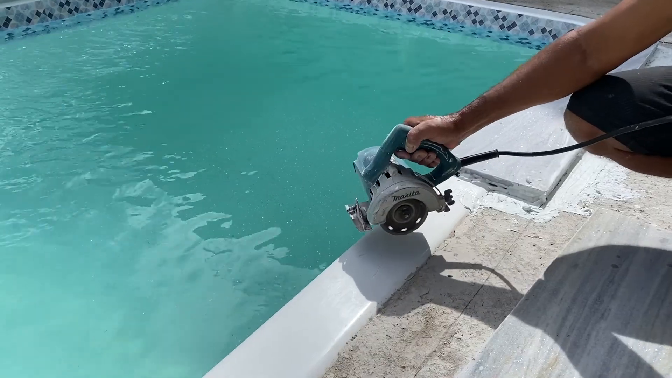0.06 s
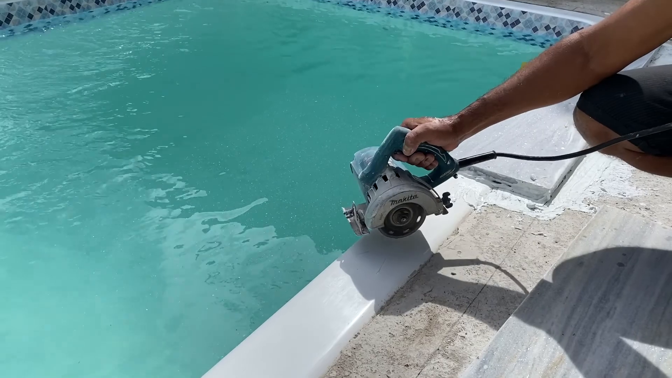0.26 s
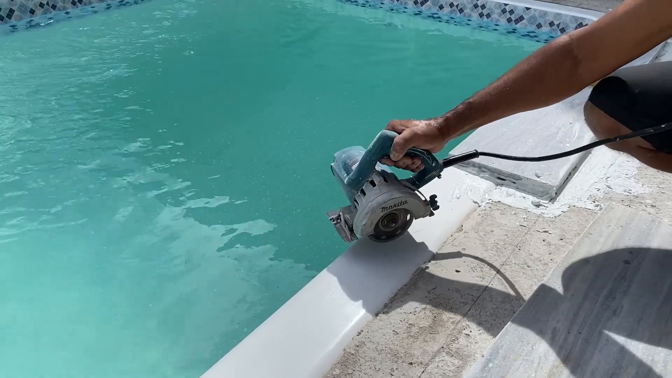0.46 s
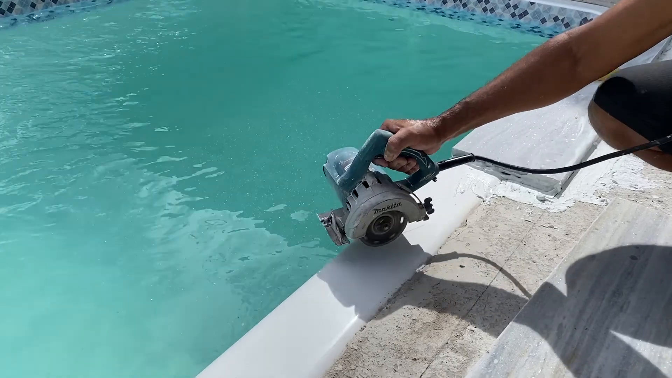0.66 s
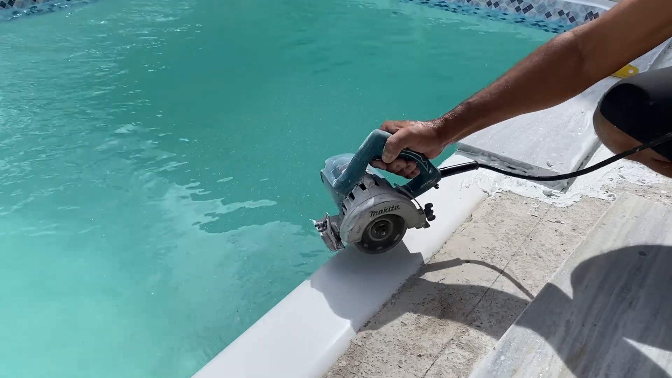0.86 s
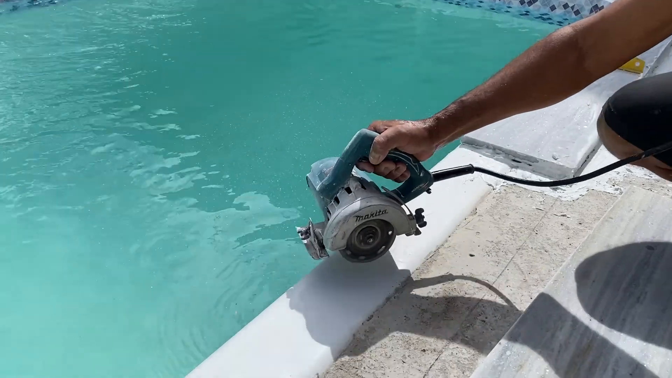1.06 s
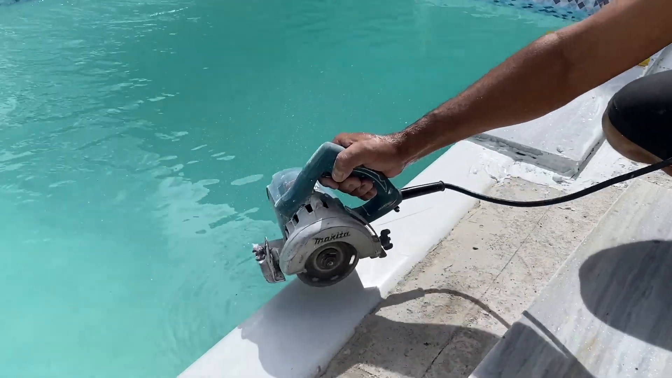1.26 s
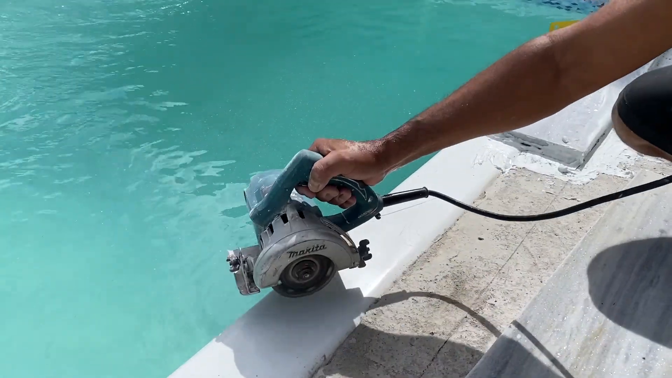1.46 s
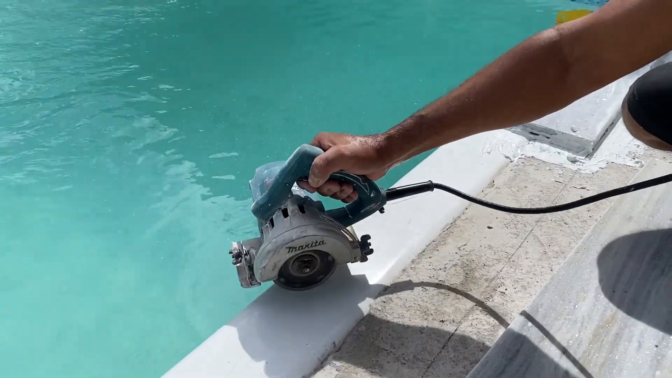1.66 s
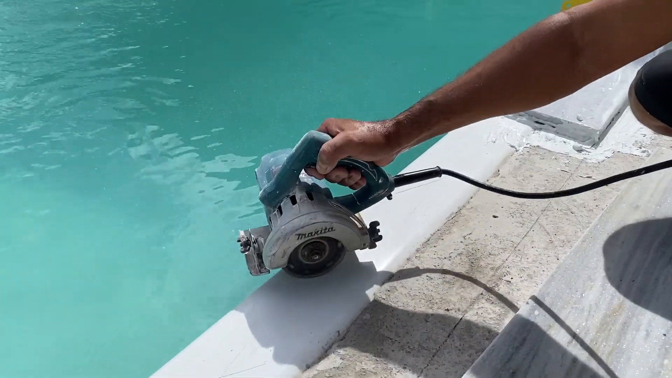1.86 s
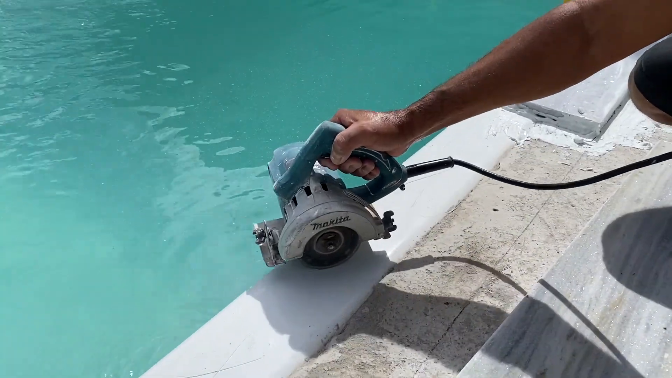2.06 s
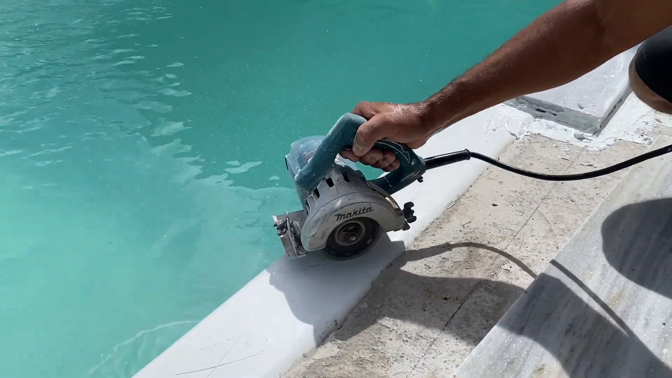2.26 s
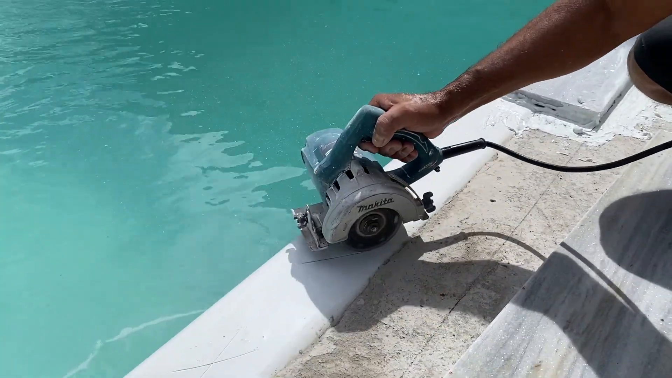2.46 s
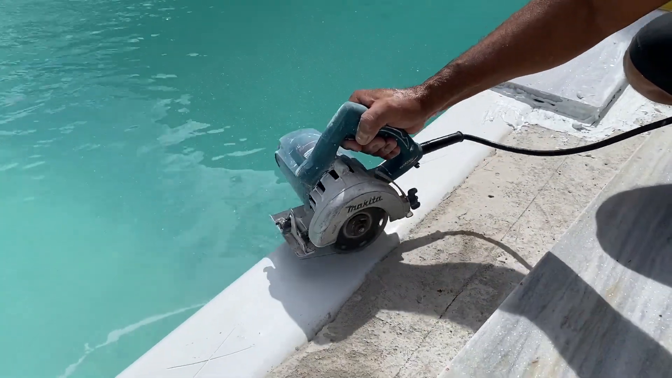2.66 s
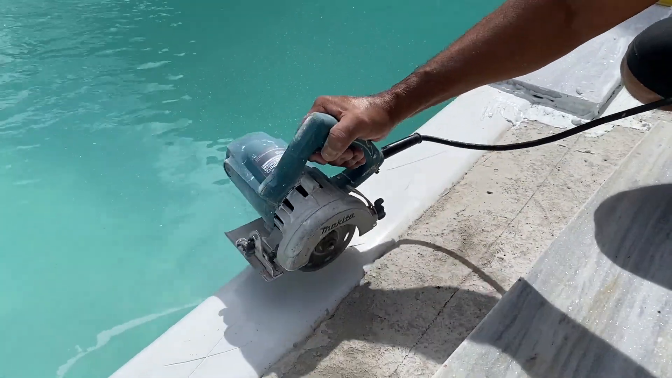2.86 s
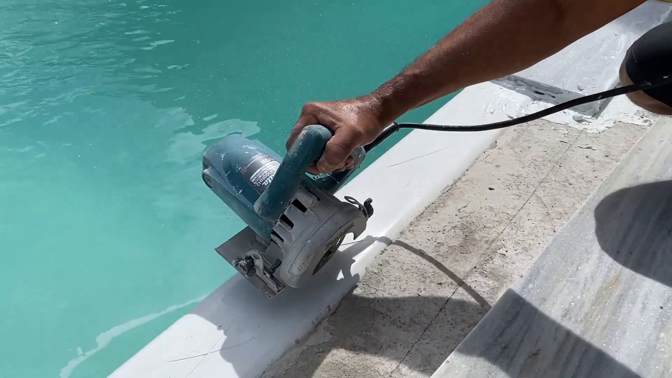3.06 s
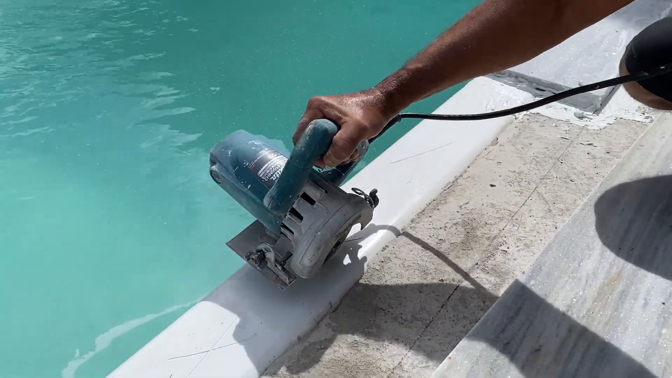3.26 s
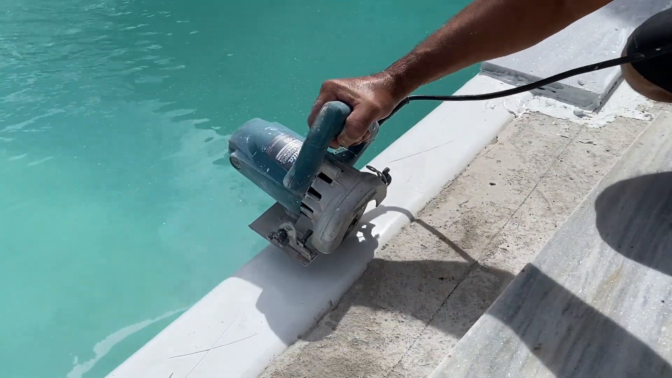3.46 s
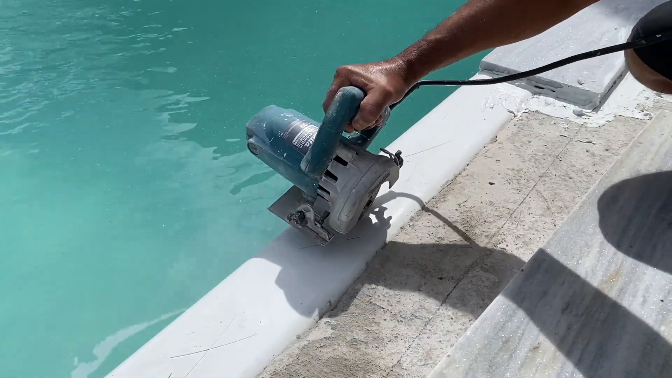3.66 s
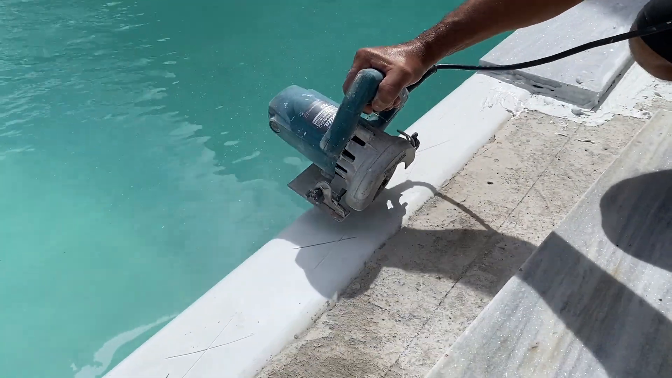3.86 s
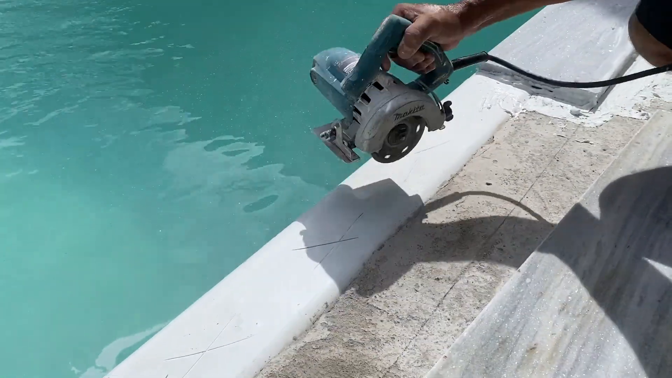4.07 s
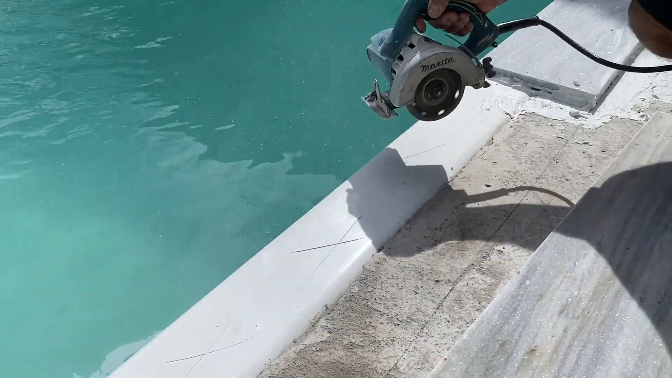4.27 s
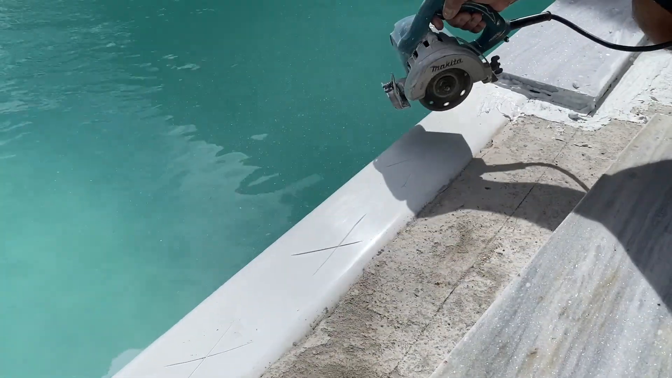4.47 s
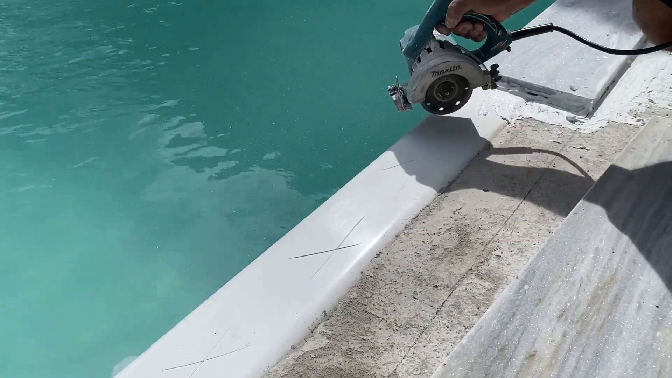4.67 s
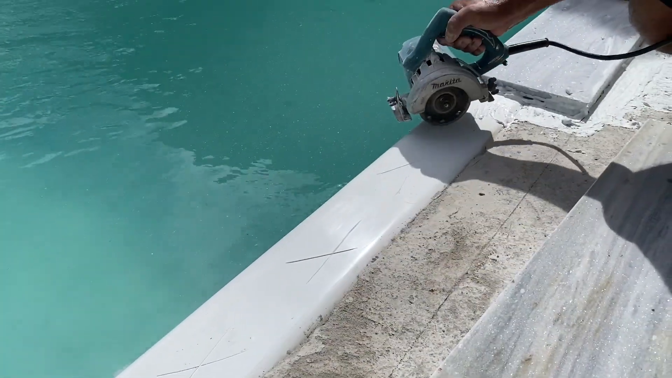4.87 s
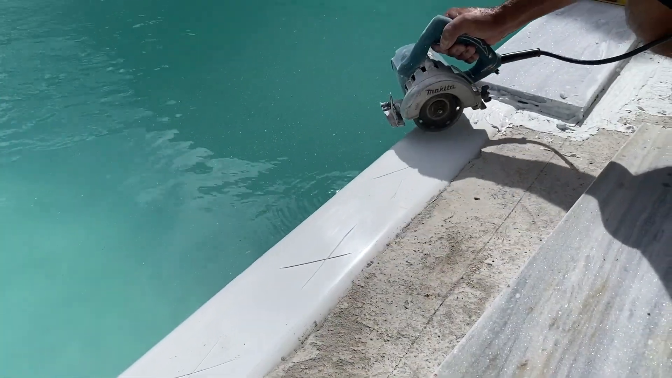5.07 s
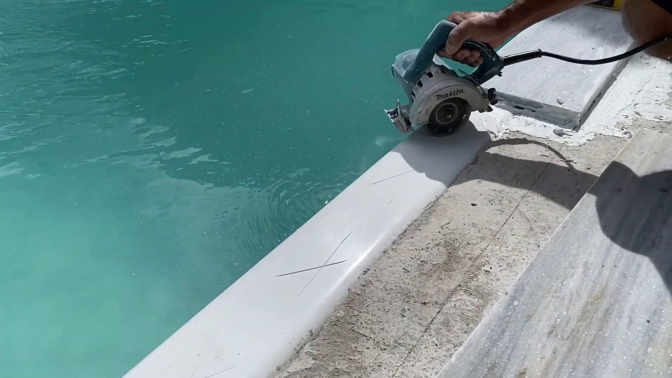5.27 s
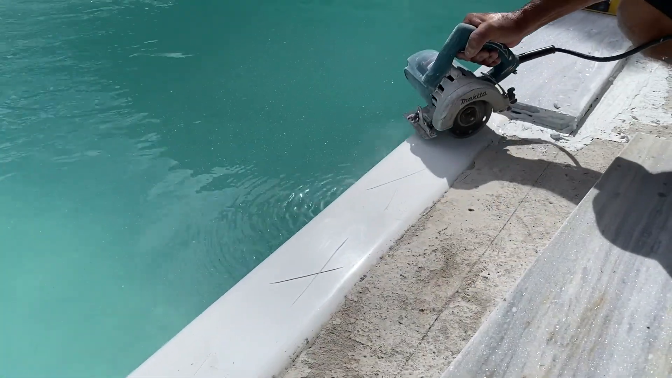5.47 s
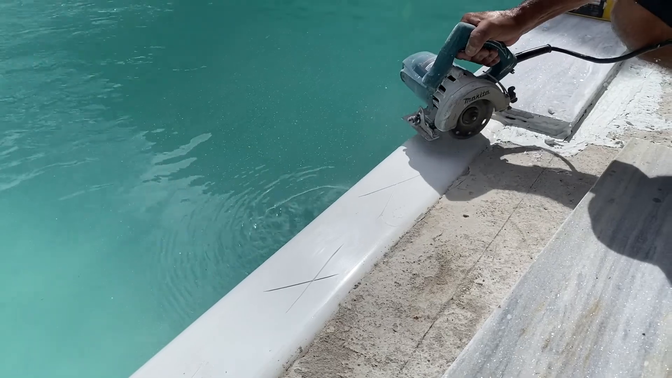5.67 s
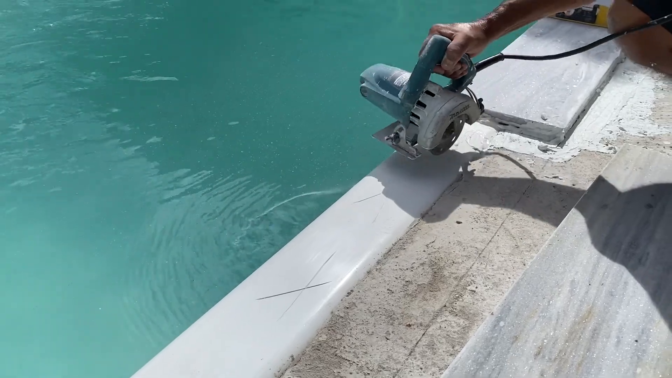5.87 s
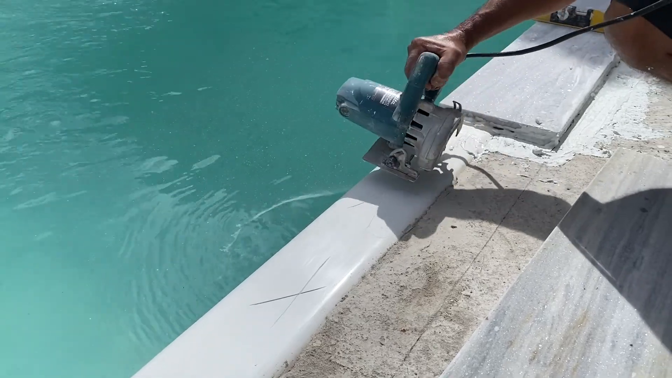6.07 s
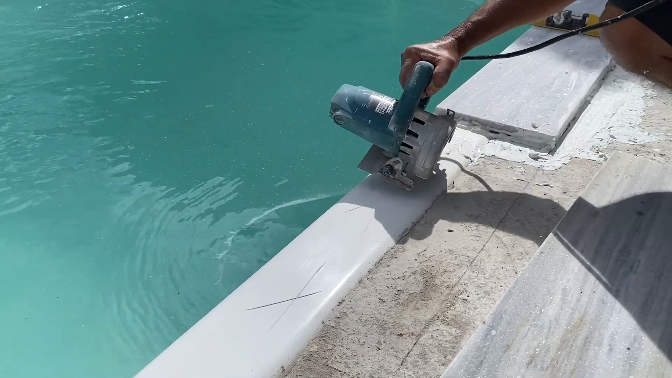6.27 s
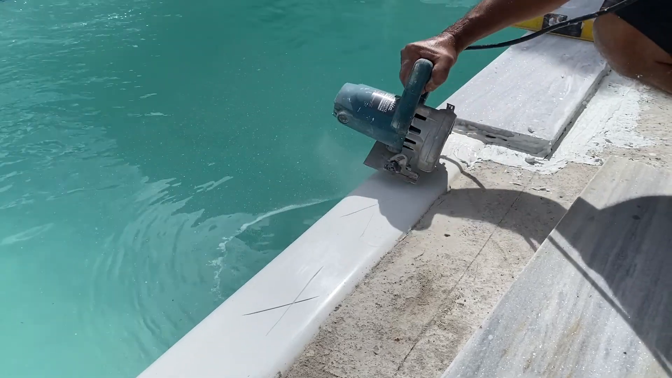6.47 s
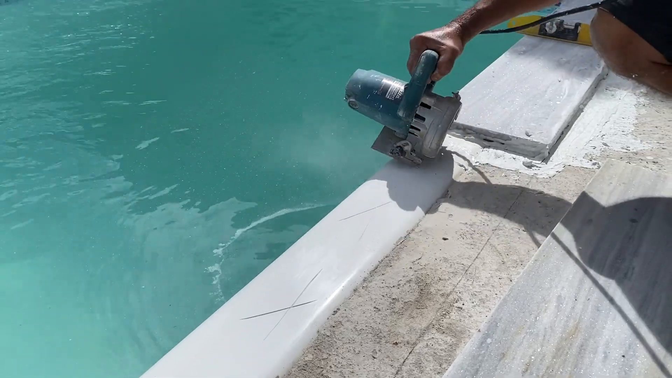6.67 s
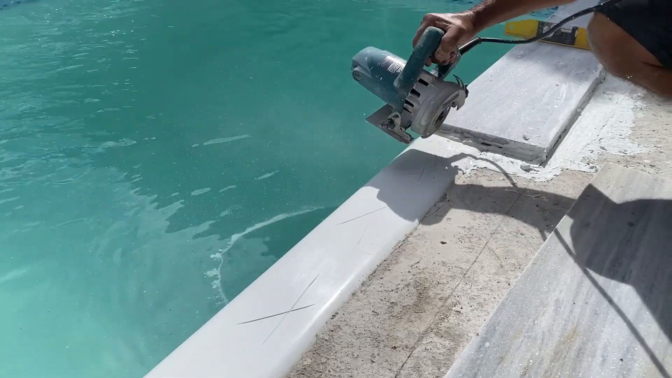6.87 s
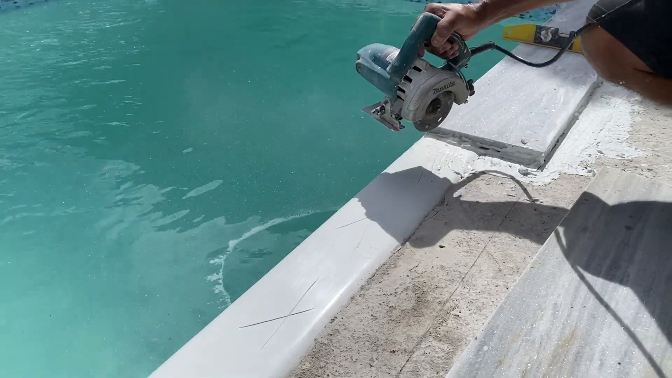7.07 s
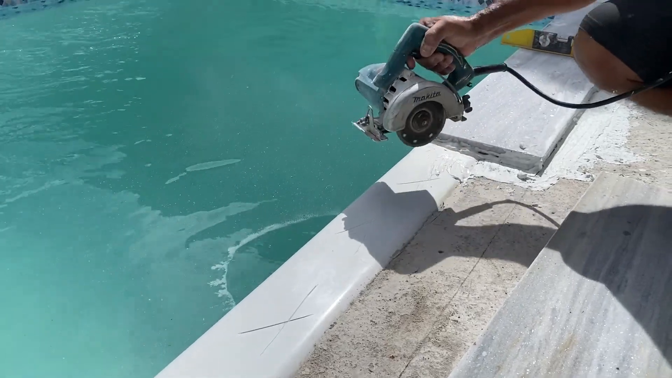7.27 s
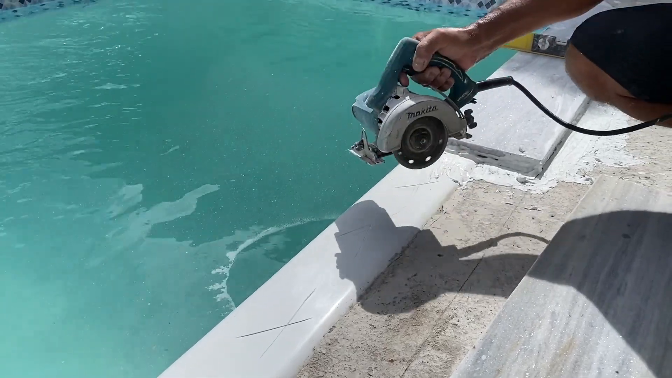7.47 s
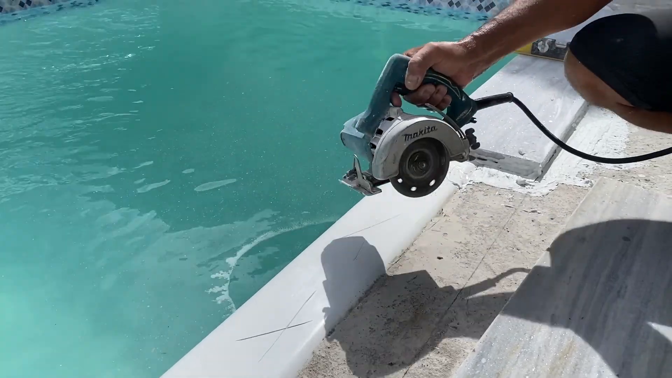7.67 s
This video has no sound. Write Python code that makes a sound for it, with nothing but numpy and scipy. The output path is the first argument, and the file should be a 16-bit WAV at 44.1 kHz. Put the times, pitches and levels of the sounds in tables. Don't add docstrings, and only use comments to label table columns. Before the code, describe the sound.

A handheld electric stone cutter whirs up beside a pool, then bites four times into stone coping with harsh ringing, gritty, sagging screeches.

```python
import sys
import numpy as np
from scipy import signal
from scipy.fft import rfft, irfft, next_fast_len
from scipy.io import wavfile
from scipy.ndimage import uniform_filter1d

SR = 44100
rng = np.random.default_rng(int(sys.argv[2]) if len(sys.argv) > 2 else 0)


def to_wav(s):
    ch = np.atleast_2d(s).T
    pcm = np.round(np.clip(ch, -1, 1) * 32767)
    wavfile.write(sys.argv[1], SR, pcm.astype(np.int16))


def makeup_ratio(level_db):
    decades = np.asarray(level_db, float) / 20
    return 10 ** decades


N = 340452
TIME = np.arange(N) / SR
SIZE = next_fast_len(N + 4096)
HZ = np.maximum(np.arange(SIZE // 2 + 1) * SR / SIZE, 1)
HEAD_ON_S = 3.9


def rms_one(x):
    return x / np.sqrt(np.mean(x ** 2) + 1e-20)


def in_time(rows, time=TIME):
    s, *columns = np.transpose(rows)
    return [np.interp(time, s, column) for column in columns]


def at_hz(points, hz):
    points = np.array(points)
    return np.interp(np.log(hz), np.log(points[:, 0]), points[:, 1])


def tone(cycles):
    return np.sin(2 * np.pi * cycles)


def bell(s, half_s, power=2):
    return np.exp(-((TIME - s) / half_s) ** power)


def drift(rate, size=N, step=1):
    r = np.exp(-80 * np.pi * rate / SR)
    white = rng.standard_normal(size // 40 + 1002)
    slow = rms_one(signal.lfilter([1], [1, -2 * r, r * r], white)[1000:])
    return np.interp(np.arange(0, size, step) / 40, np.arange(len(slow)), slow)


# (frequency [Hz], share alike [0-1])
COHERENCE = [(60, 0.58), (300, 0.66), (1500, 0.45), (3000, 0.86), (5500, 0.65), (7000, 0.57), (8000, 0.86),
             (15000, 0.71)]


def banded_noise(spectrum, patchy_db, band_db):
    white = rfft(rng.standard_normal((2, SIZE)))
    white *= makeup_ratio(at_hz(spectrum, HZ)) / (1 + (115 / HZ) ** 6)
    white /= np.sqrt(np.mean(np.abs(white[0]) ** 2) / SIZE)
    alike = np.clip(at_hz(COHERENCE, HZ), 0, 1)
    white *= np.sqrt([(1 + alike) / 2, (1 - alike) / 2])
    out = 0
    together = drift(6.0)
    place = np.clip(np.log2(HZ / 150) / .75, 0, 9)
    for k in range(10):
        share = np.cos(np.pi / 2 * np.clip(place - k, -1, 1)) ** 2
        flicker_db = patchy_db * (0.33 * together + drift(31.0))
        gain = makeup_ratio(band_db(150 * 2 ** (.75 * k)) + flicker_db)
        out = out + gain * irfft(white * share, SIZE)[:, :N]
    return out


# (time [s], level [dB], half length [s])
GUSTS = [(.15, -60, 0.37), (0.525, -50.5, 0.097), (0.96, -60, 0.26), (1.5, -71, 0.24), (2.1, -77, .3),
         (2.7, -75, 0.37), (3.6, -81, .12), (3.95, -73, .12), (4.45, -67, 0.13), (4.87, -68, 0.2),
         (5.25, -67.5, 0.14), (5.55, -72, .1), (6.35, -73, 0.52), (7.08, -66, 0.14), (7.449, -71.5, 0.25)]


def wind():
    band = signal.butter(4, [40.0, 115.0], "band", fs=SR, output="sos")
    low = signal.sosfilt(band, rng.standard_normal((2, N)))
    gusts = makeup_ratio(-96) + sum(makeup_ratio(db) * bell(s, half_s) for s, db, half_s in GUSTS)
    lumps = gusts * makeup_ratio(2.0 * drift(6.6))
    return lumps * (rms_one(low[0]) + 0.26 * rms_one(low[1]) * np.array([[1], [-1]]))


# (frequency [Hz], level [dB])
PUMP = (232.8, -67.5)


def pump():
    hz, db = PUMP
    gain_db = 0.86 * (layers()[0] + 55.2)
    return makeup_ratio(db + gain_db + 1.0 * drift(0.31)) * tone(hz * TIME)


# (time [s], blade speed [turns/s])
TRIGGER = [
    (0, 139),
    (4.02, 166),
    (4.72, 130),
    (6.92, 165.4),
    (7.72, 126.6),
]


def coasting(time):
    idle = 0
    for off, on in zip(TRIGGER[1::2], TRIGGER[2::2]):
        released = (time > off[0]) & (time <= on[0] + 1 / SR)
        idle = idle + released * (1 - np.exp(-np.abs(time - off[0]) / 0.42))
    return idle


# (time [s], blade speed [turns/s])
SAG = [(1.635, 172), (1.7, 176.6), (1.86, 176), (1.94, 174.7), (2.02, 173.1), (2.06, 172), (2.26, 168.8),
       (2.38, 167.5), (2.465, 167.1), (3.16, 175.4), (3.27, 175), (3.39, 173), (3.51, 169.6), (3.63, 167.6),
       (3.79, 165.1), (3.85, 164.8), (5.06, 155.8), (5.16, 158.4), (5.24, 159.4), (5.32, 159.8),
       (5.4, 159.4), (5.5, 158.5), (5.58, 158.4), (6.22, 173.6), (6.33, 172.9), (6.41, 171.5),
       (6.49, 168.3), (6.53, 166.3), (6.57, 165.1), (6.61, 163.2), (6.65, 162.1), (6.725, 161.5)]


def spin():
    free_speed = 181.0
    s, speed = np.transpose(sorted(TRIGGER + SAG))
    gap = np.exp(np.interp(TIME, s, np.log(np.maximum(free_speed - speed, .5))))
    return np.where(coasting(TIME) > 0, np.interp(TIME, s, speed), free_speed - gap)


# (time [s], nearness [dB], vents turned toward the listener [dB])
NEARNESS = [(0, 8, 0), (.6, 9, 0.5), (.95, 9, 0), (1.3, 8.5, 6), (1.62, 7, 3), (2.5, -0.5, 1),
            (2.8, 0.5, 3.5), (3.14, 0.5, 4.5), (3.88, 0.5, 0), (4.15, -0.5, 5.5), (4.5, -5, 1.5),
            (4.76, -5, 4.5), (5.62, -1, 1.5), (5.9, 2, -2), (6.2, 4, 0.5), (6.92, 1, -3.5), (7.2, 0, 2),
            (7.72, 0, 6)]
# (level [dB], share of nearness [ratio], change when coasting [dB],
# change under the first strain [dB], strain fade [s])
LAYERS = [
    (-55, 0.63, -4.5, 4.5, 0.88),
    (-45.5, 0.82, 0, 3, 0.93),
    (-42, 0.59, 1, 9, 1),
    (-52, 0.9, -5.5, -1.5, 0.65),
    (-44, 0.84, -9.5, -19, 0.19),
]
VENT_SHARE = (-0.16, 0.63, -0.43, -0.0053, -0.39)


def layers(time=TIME):
    near_db, vents_db = in_time(NEARNESS, time)
    idle = coasting(time)
    return [db + share * near_db + turn * vents_db + coast_db * idle + strain_db * np.exp(-time / fade_s)
            for (db, share, coast_db, strain_db, fade_s), turn in zip(LAYERS, VENT_SHARE)]


# (time [s], peak level [dB], 60 dB decay time [s])
TICKS = [
    (1.646, -18, 0.06),
    (3.173, -26, 0.03),
    (4.7393, -34, 0.019),
    (4.7901, -42, 0.021),
    (6.2295, -28, 0.02),
]
# (time [s], peak level [dB])
SPARKS = [(0.0513, -30), (0.0757, -31), (0.1376, -31), (0.2049, -31), (0.2443, -30), (0.2902, -34),
          (0.3411, -34), (0.41, -33), (0.4509, -28), (0.4883, -30), (0.5252, -31), (0.5501, -29),
          (0.5691, -29), (0.5911, -34), (0.6114, -29), (0.6679, -34), (0.734, -33), (0.817, -37),
          (0.8385, -39), (0.8989, -36), (0.9163, -37), (0.94, -37), (0.9667, -33), (0.9916, -34),
          (1.0161, -38), (1.0419, -38), (1.0829, -39), (1.2073, -35), (1.2356, -37), (1.2645, -35),
          (1.293, -29), (1.3209, -35), (1.35, -34), (1.3823, -37), (1.4142, -37), (1.6492, -30)]


def clicks():
    out = np.zeros(N + 4096)
    t = np.arange(2048) / SR
    for s, db, t60 in TICKS:
        burst = signal.lfilter([1, 0, -1], [1, -1.35, .4], rng.standard_normal(len(t)))
        out[int(s * SR):][:len(t)] += burst * makeup_ratio(db - 12.0 - 60 * t / np.clip(t60, .003, .1))
    arcs = [(s, db, 14500 + 150 * rng.standard_normal()) for s, db in SPARKS]
    chance = rng.random((90, 3))
    at = chance[:, 0] * TIME[-1]
    small_db = layers(at)[3] + 8.4 + 4.5 * chance[:, 1]
    small_hz = np.where(chance[:, 2] < .6, 12750., 13600.) + 310.0 * chance[:, 1]
    for s, db, hz in arcs + list(zip(at, small_db, small_hz)):
        rough = 0.46 + rms_one(uniform_filter1d(rng.standard_normal(len(t)), size=30))
        envelope = makeup_ratio(db + 3.5 - 60 * t / 0.03) * np.minimum(t / 0.0004, 1)
        out[int(s * SR):][:len(t)] += envelope * rough * tone(hz * t)
    return out[:N]


# (time [s], half length [s], frequency [Hz], level [dB])
WHISTLE = (0, 1.4, 2207.5, -42)
# (time [s], half length [s], added share [ratio])
WHISTLE_BURST = (0.18, 0.086, 1.2)
# (time [s], half length [s], frequency [Hz], level [dB])
HIGH_WHISTLE = (1, -1, 3962, -54)


def vent_whistles():
    s, half_s, hz, db = WHISTLE
    burst_s, burst_half_s, share = WHISTLE_BURST
    breathy = makeup_ratio(db + 1.9 * drift(25.0)) * bell(s, half_s) * (1 + share * bell(burst_s, burst_half_s, 4))
    early = breathy * np.sin(2 * np.pi * hz * TIME + 0.51 * drift(18.0))
    s, half_s, hz, db = HIGH_WHISTLE
    upper = makeup_ratio(db) * bell(s, half_s) * np.sin(2 * np.pi * hz * TIME + 1.2 * drift(30.0))
    return early + upper


# (multiple of blade speed [ratio], level re casing [dB])
WHINE = [
    (1.0, -15),
    (2.583, -8.5),
    (31.0, -8),
]
# (multiple of blade speed [ratio], level re brush hiss [dB])
COMMUTATOR = (80.08, -8.0)


def shaft_lines(turns):
    casing_db, _, _, brush_db, _ = layers()
    settled = np.clip(TIME / .5, .1, 1)
    slack_db = -3.5 * coasting(TIME)
    lines = 0
    for multiple, db in WHINE:
        lines = lines + settled * makeup_ratio(casing_db + db + slack_db + 2 * drift(2.1)) * tone(multiple * turns)
    multiple, db = COMMUTATOR
    bared_db = 5 * (TIME > TRIGGER[3][0])
    return lines + makeup_ratio(brush_db + db + bared_db + 2 * drift(4.6)) * tone(multiple * turns)


# (frequency [Hz], density [dB per Hz])
ROAR = [(100, -22), (300, -21.5), (700, -13.5), (980, -11), (1150, -7), (1750, -3.5), (2300, -4),
        (3300, -3), (4500, -7), (6500, -11), (8500, -11.5), (10500, -15.5), (13000, -14.5), (15500, -18)]
# (time [s], centre [Hz], added level [dB])
HUMP = [(0, 2660, -10), (.25, 2803, 3), (.5, 2962, -2), (.9, 2940, 2), (1.45, 3073, 1.5), (3.1, 3127, 1),
        (3.9, 2867, 1), (4.06, 3130, 3.5), (4.16, 2850, 3.5), (4.43, 2884, 4), (4.52, 2543, 1),
        (4.75, 2540, -0.5), (5.05, 2714, 2.5), (5.7, 2862, 0.5), (6.1, 3075, 1), (6.9, 2897, 0.5),
        (7.1, 2696, -1), (7.3, 2864, -4), (7.72, 2790, -7)]
# (frequency [Hz], width [Hz], level [dB])
HOUSING = [(620, 220, 2.5), (766, 21, -7), (2160, 35, 6), (2500, 100, -2.5), (4067, 68, 7), (4440, 22, 7),
           (5780, 160, -5), (13100, 500, -0.5)]


def fan_air(turns):
    casing_db, vent_db, fan_db, brush_db, hump_db = layers()
    levels = casing_db + 19.0, vent_db + 6.0, fan_db + 2.5, brush_db + 16.5

    def band_db(hz):
        place = np.interp(np.log(hz), np.log([600, 1500, 3200, 9000]), range(4))
        return sum(max(0, 1 - abs(place - k)) * db for k, db in enumerate(levels))
    roar = banded_noise(ROAR, 0.97, band_db) * (1 + 0.19 * tone(2.583 * turns))
    hump_hz, aimed_db = in_time(HUMP)
    lowpass = signal.butter(2, 287, fs=SR, output="sos")
    slow = signal.sosfilt(lowpass, rng.standard_normal((3, N)))
    vanes = 2 * np.pi * np.cumsum(hump_hz) / SR
    common = slow[0] * np.sin(vanes) + slow[1] * np.cos(vanes)
    apart = 0.41 * slow[2] * np.sin(vanes)
    roar += makeup_ratio(hump_db + aimed_db) * rms_one(np.array([common, apart]))
    colour_db = sum(db / (1 + (2 * (HZ - hz) / width) ** 2) for hz, width, db in HOUSING)
    return irfft(rfft(roar, SIZE) * makeup_ratio(colour_db), SIZE)[:, :N]


def motor(turns):
    out = fan_air(turns)
    out[0] += shaft_lines(turns) + vent_whistles()
    return out


# (multiple of the speed [ratio], level in bite one, two, three, four [dB])
RIMS = [(2, -12, -11, -21, -18.5), (3, -10.5, -7, -11, -14.5), (4, -5, -5, -2.5, -7),
        (5, -13, -9, -10, -8.5), (6, -11.5, -16, -19, -7.5), (7, -7, -5, -13, -3.5),
        (8, -6.5, -5, -3.5, -2), (9, -12, -14, 1, 2), (10, -14, -27, -7.5, -12), (11, -17, -26, -20, -6),
        (12, -3, -2, -1.5, -6), (13, -5, -6, -8, -1.5), (14, -24, -17, -7, -18)]
# (multiple [ratio], start to end side-on [dB], the same head-on [dB])
SINK = [(2, -7.5, -15), (3, -11, -8), (4, 6.5, 9.5), (5, 1, 2), (6, -24, 2), (7, -10, -9), (8, -16, -4),
        (9, 11, -2), (10, -11, 9), (12, -1, -5), (14, -9, 13)]
# (frequency [Hz], width [Hz], level in bite one, two, three, four [dB])
BLADE = [(2420, 190, -19, -15, -1, -21), (2920, 94, 4, 0, 2, -15), (3356, 195, 2, 6.5, 4, 2.5),
         (3980, 170, -2.5, 1, 5, 0.5), (4290, 63, -15, -9, 2.5, -5), (4500, 130, -4, -9, -5, -1),
         (4760, 47, -17, -17, -5, -20), (5180, 200, -3, -8, -3, -11), (5560, 170, -7, -19, -8, -8),
         (6490, 128, 9, -8.5, 2, -4.5), (7070, 97, -6, -11, -6, -7), (8580, 380, -6, -1, -26, -8),
         (10980, 200, -6, -1.5, -13, -23), (14000, 400, -6, -8, -19, -25)]
# (frequency [Hz], width [Hz], level [dB])
BLADE_NODE = (5900, 430, -19)
# (grit re singing [dB], its change start to end [dB], thump re singing [dB], its change [dB],
# brightening [dB per octave])
CONTACT = [
    (-9.5, -6.5, -27.5, -1, 9),
    (-8, -3.5, -22.5, -6, -17),
    (-10, -2, -38, 7, 0),
    (-12, 1, -32.5, -1, 21),
]


def multiple_gain(k, n, hz, sing_db, depth, head_on):
    _, _, thump_db, thump_trend_db, brighten_db = CONTACT[n]
    if k == 1:
        return makeup_ratio(sing_db + thump_db + thump_trend_db * depth + 1.5)
    if k <= RIMS[-1][0]:
        sink = np.array(SINK)
        sink_db = np.interp(k, sink[:, 0], sink[:, 1 + head_on])
        return makeup_ratio(sing_db - 12.0 + RIMS[k - 2][1 + n] + sink_db * depth)
    modes = np.array(BLADE)
    octaves = np.clip(np.log2(modes[:, 0] / 3760), -.4, 1)
    ringing = makeup_ratio(modes[:, 2 + n] + np.outer(depth, brighten_db * octaves))
    off = 2 * (hz[:, None] - modes[:, 0]) / modes[:, 1]
    gain = makeup_ratio(sing_db - 12.5) * (np.sum(ringing / (1 + off ** 2), axis=1) + makeup_ratio(-14.5))
    node_hz, width, node_db = BLADE_NODE
    return gain * makeup_ratio(node_db / (1 + (2 * (hz - node_hz) / width) ** 4))


# (time [s], length [s], frequency [Hz], added level [dB])
FLARES = [(1.87, 0.23, 4050, 11), (1.94, 0.2, 1400, 13), (2.115, 0.2, 5500, 14), (2.263, 0.1, 5150, 14),
          (2.383, 0.16, 3350, 9), (2.085, 0.2, 3280, 14.5), (2.5, 0.27, 4150, -5), (1.6, .3, 5100, -12),
          (3.56, 0.13, 3300, 14), (3.54, 0.07, 4700, 3), (3.78, 0.14, 4130, 20), (3.722, 0.3, 4550, 16),
          (3.55, 0.12, 6430, 12), (3.6, 0.31, 4540, -9), (4.5, .12, 3350, -7), (5.5, 0.1, 5250, 5),
          (5.47, 0.23, 6523, -7), (5.5, 0.27, 10870, 12.5), (1.785, 0.18, 7800, 14),
          (6.471, 0.055, 5200, 16), (6.59, 0.17, 4450, 7), (6.63, 0.054, 2130, 15),
          (6.693, 0.057, 1130, 13.5), (6.6, 0.2, 3400, -1), (6.5, 0.077, 2200, 9), (6.57, 0.32, 3800, 8),
          (5.3, 0.25, 4220, 11), (5.5, 0.13, 5200, 6), (3.4, 0.07, 6450, 3), (5.38, 0.26, 6380, 5),
          (6.8, .1, 4500, 8), (6.55, .08, 4650, 8), (3.62, .17, 4020, 4), (3.28, 0.084, 4030, 10),
          (3.27, 0.08, 6500, 6.5), (6.31, 0.097, 6200, 14)]
# (time [s], length [s], frequency [Hz], added
# level [dB])
MORE_FLARES = [(1.8, 0.073, 6520.0, -4), (1.85, 0.18, 3330, -3), (1.92, 0.12, 1400.0, -2.5),
               (2.27, 0.38, 2870.0, 3), (3.29, 0.062, 3320.0, -11), (3.45, 0.089, 3270.0, 10),
               (3.48, 0.38, 2920, -10), (3.52, 0.38, 3392, -5), (3.6, 0.21, 4000, 6), (3.64, 0.47, 4570, 4.5),
               (3.73, 0.074, 3000.0, 12), (3.75, 0.1, 3980.0, -10), (5.29, 0.27, 3510.0, 6),
               (5.42, 0.12, 3340.0, 4.0), (5.45, 0.26, 4290.0, -2), (5.46, 0.08, 3490.0, -9.0),
               (5.48, 0.11, 4130.0, 9), (5.48, 0.1, 5080.0, 1), (5.49, 0.21, 3590, 13), (5.52, 0.12, 4470, 6),
               (5.54, 0.054, 3900, 3), (6.37, 0.13, 3920, 6.5), (6.42, 0.26, 3360, -3), (6.46, 0.2, 3530, 10),
               (6.48, 0.23, 1510, 3.0), (6.49, 0.12, 3880.0, -7), (6.54, 0.17, 3990.0, -8),
               (6.54, 0.39, 2990.0, 6.0), (6.61, 0.068, 2130.0, -4.5), (6.62, 0.18, 1460, -5.5),
               (6.62, 0.18, 4370, 4), (6.62, 0.18, 6200, 14), (6.63, 0.12, 7880, 20)]
# (time [s], length [s], frequency [Hz], added
# level [dB])
LAST_FLARES = [(1.87, 0.18, 7030.0, 6), (1.99, 0.13, 2290, -1), (2.0, 0.073, 6400, -2), (2.0, 0.1, 3480, 7),
               (2.03, 0.18, 3140, 5), (2.04, 0.12, 3300, -4), (2.09, 0.16, 2910.0, -6), (2.16, 0.054, 6430, -11),
               (2.18, 0.12, 4600, 8.0), (2.19, 0.26, 10350.0, 12), (2.21, 0.18, 4920, 14),
               (2.23, 0.29, 3400, -4.5), (2.25, 0.44, 6850, 4), (2.31, 0.13, 6280, 7), (2.31, 0.13, 6560.0, -3),
               (2.34, 0.12, 10750.0, 14), (2.37, 0.15, 10900, -7), (3.3, 0.26, 10980.0, 1),
               (3.35, 0.07, 3300.0, 5), (3.38, 0.15, 10970, -4), (3.48, 0.38, 2560.0, -5), (3.52, 0.42, 3920, -10),
               (3.53, 0.068, 4500, 13), (3.53, 0.087, 5080.0, 13), (3.6, 0.2, 3015, 8.0), (3.68, 0.3, 4500.0, 3.5),
               (3.75, 0.1, 6460.0, 5), (3.76, 0.18, 3140.0, -5), (3.79, 0.073, 3300.0, 0),
               (3.79, 0.12, 4290.0, -4), (5.29, 0.38, 3986, -2.5), (5.35, 0.23, 7200, -3), (5.39, 0.41, 3353, -3),
               (5.45, 0.22, 3470, -2.5), (5.47, 0.18, 4760.0, 4), (5.48, 0.08, 4280.0, -7),
               (5.52, 0.14, 2380.0, -12.0), (5.52, 0.11, 5230.0, -6), (6.36, 0.17, 3960.0, -2.5),
               (6.43, 0.077, 2880, -3), (6.43, 0.1, 3050, 13), (6.48, 0.29, 3320, -5), (6.5, 0.18, 3510.0, -1),
               (6.53, 0.12, 4480.0, -4), (6.54, 0.26, 5020, -7), (6.55, 0.067, 2860, 13),
               (6.57, 0.073, 4300.0, -7), (6.64, 0.2, 2920.0, 0), (6.65, 0.11, 6430, -2)]


def blade_song(n, start, end, sing_db, depth, fade, speed, turns):
    size = len(fade)
    coarse = np.arange(0, size, 64)
    changes = np.array([row for row in FLARES + MORE_FLARES + LAST_FLARES if start < row[0] < end])
    time = start + coarse / SR
    swell_db = changes[:, 3] * np.exp(-(2 * (time[:, None] - changes[:, 0]) / changes[:, 1]) ** 4)
    song = np.zeros(size)
    for k in range(1, 82):
        hz = k * speed[coarse]
        gain = multiple_gain(k, n, hz, sing_db, depth, int(start > HEAD_ON_S))
        wear, wander = drift(12.5, size, step=64), drift(19.0, size, step=64)
        near = 1 / (1 + ((hz[:, None] - changes[:, 2]) / 95.0) ** 2)
        change_db = min(1.6, 1.0 + 0.29 * k) * wear + np.sum(swell_db * near, axis=1)
        gain = np.interp(np.arange(size), coarse, gain * makeup_ratio(change_db))
        slip = np.interp(np.arange(size), coarse, .007 * k * wander)
        song += fade * gain * np.sin(2 * np.pi * (k * turns + rng.random()) + slip)
    return song


# (frequency [Hz], density [dB per Hz])
GRIT = [(200, -17.5), (700, -10.5), (1400, -7), (3000, -5), (4500, 0), (5800, -7), (7000, -6), (10000, -4),
        (13500, -5.5), (15500, -6)]
# (time [s], level [dB])
BITE_ONE = [
    (1.635, -36),
    (1.655, -36.5),
    (1.691, -35.5),
    (1.943, -29),
    (2.075, -29),
    (2.133, -31.5),
    (2.313, -30.5),
    (2.425, -32),
    (2.455, -37),
]
# (time [s], level [dB])
BITE_TWO = [
    (3.16, -40),
    (3.182, -35),
    (3.244, -40),
    (3.298, -34.5),
    (3.418, -34.5),
    (3.541, -33.5),
    (3.7, -33.5),
    (3.804, -33),
    (3.85, -44),
]
# (time [s], level [dB])
BITE_THREE = [
    (5.06, -43),
    (5.15, -38.5),
    (5.19, -35.5),
    (5.3, -31),
    (5.438, -29),
    (5.538, -30.5),
    (5.58, -38.5),
]
# (time [s], level [dB])
BITE_FOUR = [
    (6.22, -55),
    (6.252, -29.5),
    (6.284, -36),
    (6.33, -32.5),
    (6.42, -30),
    (6.5, -28),
    (6.621, -27.5),
    (6.696, -34),
    (6.725, -40),
]


def bites(speed, turns):
    song = np.zeros(N)
    grit_db = np.full(N, -120.)
    for n, rows in enumerate([BITE_ONE, BITE_TWO, BITE_THREE, BITE_FOUR]):
        start, end = rows[0][0], rows[-1][0]
        span = slice(int(start * SR), int(end * SR))
        time = TIME[span]
        fade = np.clip(np.minimum(time - start, end - time) / 0.018, 1e-3, 1)
        size = len(fade)
        coarse = np.arange(0, size, 64)
        sing_db = in_time(rows, time[coarse])[0]
        depth = coarse / size - .5
        grit_re_db, grit_trend_db = CONTACT[n][:2]
        bite_db = np.interp(np.arange(size), coarse, sing_db + grit_re_db + grit_trend_db * depth)
        grit_db[span] = bite_db + 20 * np.log10(fade)
        song[span] += blade_song(n, start, end, sing_db, depth, fade, speed[span], turns[span])
    out = banded_noise(GRIT, 0.78, lambda hz: grit_db + 7.0) * (1 + 0.14 * tone(turns))
    out[0] += song
    return out


# (frequency [Hz], left minus right [dB])
TILT = [(60, -1), (110, 6), (200, 1), (380, 5), (700, 3), (1290, 3), (2380, 0), (4400, 2.5), (5600, 6),
        (8120, 2), (15000, -0.5)]
# (time [s], left minus right [dB])
PAN = [(0, -1.4), (1, -0.1), (1.7, 0.5), (3.2, 1), (4.5, -0.5), (6, -0.5), (7.7, 0)]
# (frequency [Hz], lead [rad])
LEAD_LEFT = [(0, 0), (1640, -.5), (2760, 1.0), (4480, 1.0), (5550, 2.6), (6200, .6), (6900, 0),
             (11150, -2 * np.pi), (13400, -3 * np.pi), (15200, -4 * np.pi)]
# (frequency [Hz], lead [rad])
LEAD_AHEAD = [(0, 0), (1380, -.9), (2760, .3), (5430, -.1), (6900, 0), (11150, -2 * np.pi),
              (13400, -3 * np.pi), (15200, -4 * np.pi)]


def ports(pair):
    high = np.interp(HZ, [6300, 7400], [0, 1])
    common, apart = rfft(pair, SIZE)

    def low_part(lead, spill):
        half = makeup_ratio(at_hz(TILT, HZ) / 2) * np.exp(.5j * lead)
        split = np.array([(common + apart) * half, (common - apart) / half])
        return irfft((1 - high) * split + spill * high * apart, SIZE)[:, :N]
    lead_left = np.interp(HZ, *np.transpose(LEAD_LEFT))
    lead_ahead = np.interp(HZ, *np.transpose(LEAD_AHEAD))
    pan_db = in_time(PAN)[0]
    low = np.where(TIME < HEAD_ON_S, low_part(lead_left, 0.42), low_part(lead_ahead, 0))
    low = low * makeup_ratio([pan_db / 2, -pan_db / 2])
    mid = common * np.cos(lead_ahead / 2)
    side = 1j * (common + apart) * np.sin(lead_ahead / 2)
    return low + irfft(high * np.array([mid + side, mid - side]), SIZE)[:, :N]


def scene():
    speed = spin()
    turns = np.cumsum(speed) / SR
    tool = motor(turns) + bites(speed, turns)
    tool[0] += clicks() + pump()
    return ports(tool) + wind()


def top_cut(x):
    return signal.sosfilt(signal.butter(12, 16850, fs=SR, output="sos"), x)


def record(dry):
    top = signal.ellip(12, .3, 75, 15690, fs=SR, output="sos")
    return top_cut(signal.sosfilt(top, dry))


dry = scene()
out = record(dry)
to_wav(out)
```